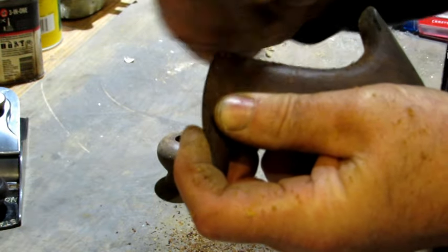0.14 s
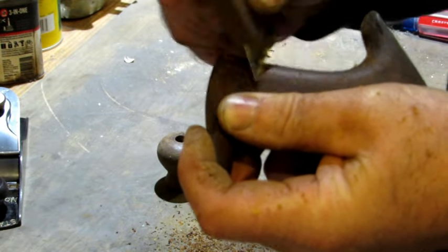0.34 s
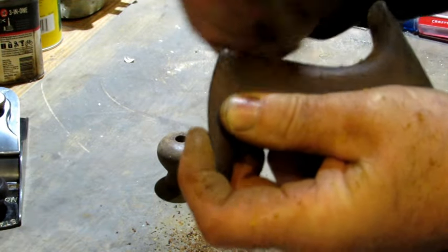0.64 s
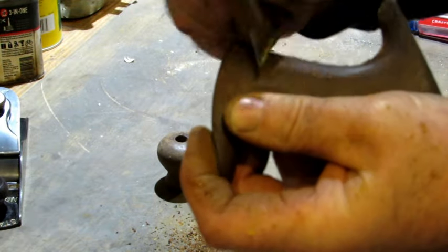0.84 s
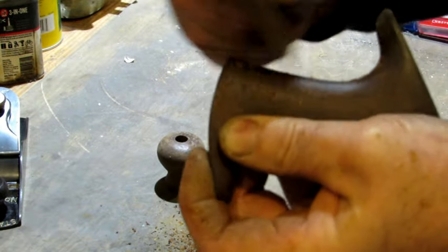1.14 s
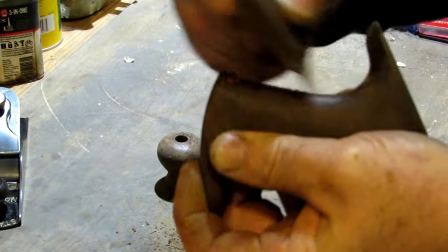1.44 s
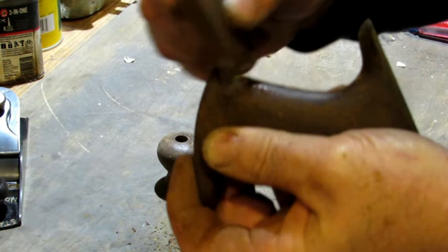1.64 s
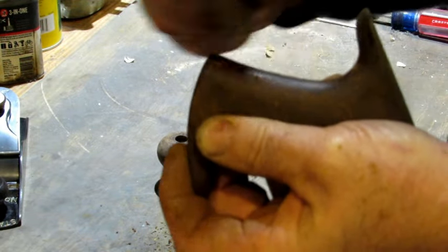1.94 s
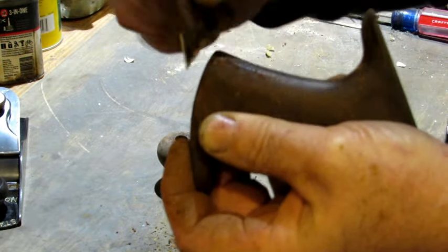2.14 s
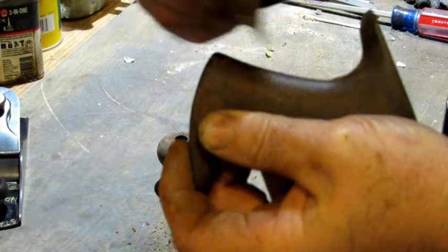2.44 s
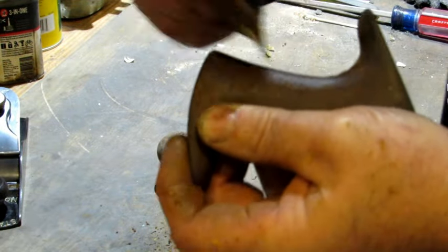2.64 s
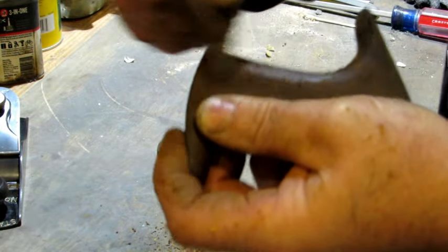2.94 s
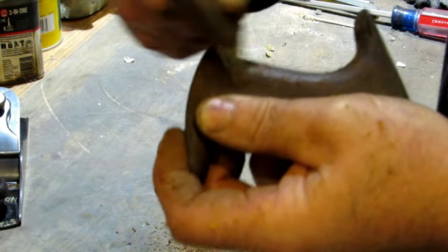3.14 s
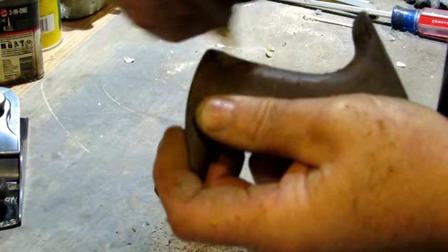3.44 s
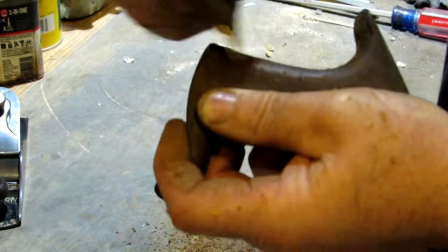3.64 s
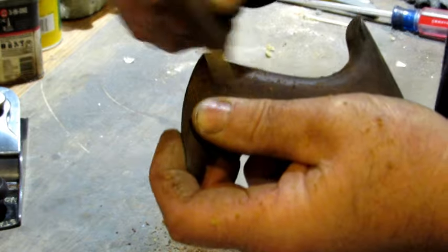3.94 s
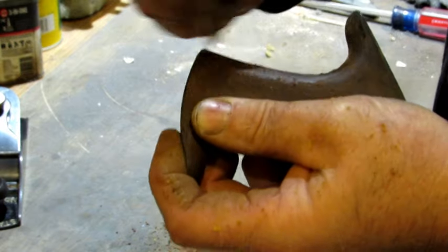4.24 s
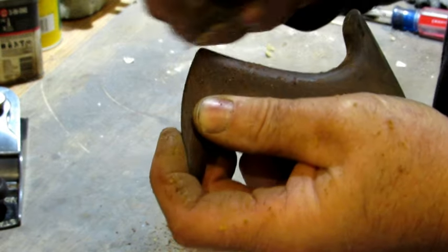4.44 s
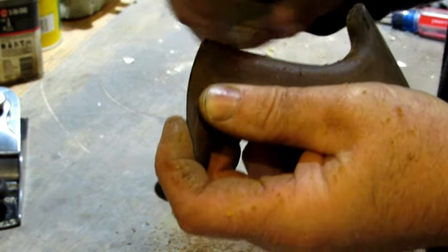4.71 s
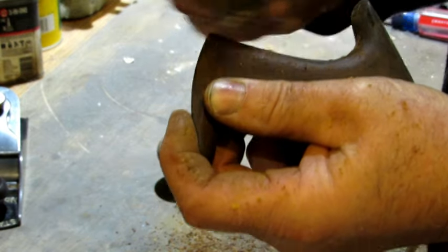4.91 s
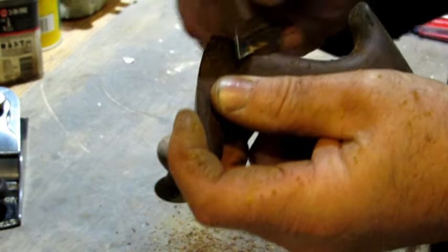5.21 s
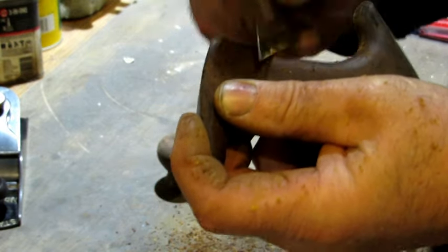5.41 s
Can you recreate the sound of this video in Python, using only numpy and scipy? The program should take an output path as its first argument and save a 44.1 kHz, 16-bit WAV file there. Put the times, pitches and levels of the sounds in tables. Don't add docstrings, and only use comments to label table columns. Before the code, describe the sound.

A small steel blade scrapes finish from a hand-held wooden handle, very close, in a quiet workshop with a short room tail. The sound begins with a scrape already landing at 0 seconds, then repeats at about 0.25, 0.5, 0.75 and 1 second. Every stroke is a dry woody knock around 2 kHz with a steely crack, followed at once by a gritty, bright hiss of some fifty milliseconds that fades with a falling, thin metallic colour. The first second is strongest, with rough judders near 0.07 and 0.35. From 1 to 2.5 seconds strokes are a little softer and evenly spaced. Near 2.7 to 3.2 they quicken and shorten, with a brief, harder rasp around 2.96. From 3.3 to 5.5 they run almost five per second, light and regular, slightly lower in colour towards the end. Faint wide air noise continues beneath, and the last scrape is cut near the end.

```python
import sys
import numpy as np
from scipy import signal
from scipy.fft import rfft, irfft, next_fast_len
from scipy.io import wavfile
from scipy.ndimage import uniform_filter1d, map_coordinates

SR = 44100
rng = np.random.default_rng(int(sys.argv[2]) if len(sys.argv) > 2 else 0)


def file_out(sig):
    cols = np.atleast_2d(sig).T
    lim = np.clip(cols, -1, 1)
    pcm = np.round(lim * 32767).astype(np.int16)
    wavfile.write(sys.argv[1], SR, pcm)


def gain_from_db(level_db):
    decades = np.asarray(level_db, float) / 20
    return 10 ** decades


N = 245548

# (frequency [Hz], width [Hz], level [dB])
WOOD_MODES = [(1650, 64, 0.5), (2000, 37, -1.5), (2085, 13.8, 4.5), (2391, 86.5, 4), (2460, 101, 6),
              (2854, 275, -4.5), (3336, 120, 0), (3650, 1140, -10), (5250, 2360, -20.5)]
# (frequency [Hz], width [Hz], level [dB])
HOLLOW_MODES = [(494, 300, -19), (589, 42, -6.5), (686, 45, -7.5), (813, 26.5, -1.5), (910, 36, -1.5),
                (1070, 100, -3), (1397, 35, -1.5)]


def cutting():
    settle_db, fade_s, leave_db = -14.5, 0.02, -48
    usual_db, body_follows, wood_grows, hollow_grows = -22, 0.58, 0.7, 0.23
    wood_db, hollow_db = -13.5, -15
    t = np.arange(N) / SR
    level = np.zeros((3, N))
    sings, streaks = [], []
    for s, bite, length, bite_db, lift_db in strokes():
        leave, sing_hz, cupped_db, mode_db = grip(s)
        lift = bite + length
        hiss = np.interp(t, [s - fade_s, s, bite, lift, lift + leave, lift + 2 * leave],
                         [-90, bite_db + settle_db, bite_db, lift_db, lift_db + leave_db, -90])
        top = max(bite_db, lift_db)
        body = np.where(hiss > -85, usual_db + body_follows * (hiss - top), -120)
        over = top - usual_db
        wood_level = body + wood_grows * over + wood_db
        hollow_level = body + hollow_grows * over + hollow_db + cupped_db
        level += gain_from_db([hiss - 1.5, wood_level, hollow_level])
        sings.append((sing_hz, 75400, 4.5))
        streaks.append((2510, 1800, mode_db))
    flakes = grit(14000, spread_db=2.5, clump_db=1.8)
    coarse = flakes + 2.2 * grit(1500, spread_db=3.5, clump_db=3)
    steel = patchy(filtered(flakes, edge), 2.8, bins=3, frames=7, glides=sings)
    wood = filtered(coarse, modes(WOOD_MODES, widen=2.16))
    wood = patchy(wood, 4, bins=2, frames=14, glides=streaks, width_hz=140)
    hollow = patchy(filtered(coarse, modes(HOLLOW_MODES, widen=3.16)), 2.1, bins=2, frames=12)
    return np.sum(level * [steel, wood, hollow], axis=0)


# (bite time [s], length [s], pressure at the bite [dB], pressure at the lift [dB])
STROKES = [(0.026, 0.058, -23.5, -19), (0.296, .053, -24.5, -20), (0.534, 0.06, -28, -19.5),
           (0.763, 0.07, -30.5, -18.5), (1.052, 0.038, -24, -23), (1.3, 0.054, -26, -27.5),
           (1.551, 0.058, -30.5, -23), (1.818, 0.065, -27, -24), (2.108, .042, -26.5, -27),
           (2.341, 0.048, -27.5, -29), (2.57, 0.029, -20.5, -29.5), (2.756, 0.027, -25, -20),
           (2.961, 0.0089, -20, -14), (3.183, 0.026, -21.5, -24.5), (3.376, 0.031, -24.5, -23),
           (3.565, 0.044, -24, -27), (3.763, 0.036, -32.5, -25.5), (3.959, 0.047, -26.5, -25),
           (4.168, 0.039, -25.5, -29.5), (4.386, 0.05, -24, -32), (4.603, 0.041, -23, -29),
           (4.806, 0.045, -26, -30), (5.028, 0.039, -25.5, -29.5), (5.247, 0.037, -30, -30.5),
           (5.463, 0.046, -25.5, -24)]


def strokes():
    settle_s = 0.029
    landed = [-settle_s] + [row[0] for row in LANDINGS]
    return [(min(s + settle_s, row[0] - 0.004), *row) for s, row in zip(landed, STROKES)]


# (time [s], time to leave the wood [s], edge sings at the start of a stroke [Hz], hand cupped
# [dB], grip mode stands out [dB])
GRIP = [
    (0, 0.13, 13900, 0, 1.5),
    (1.1, 0.09, 12800, -5, 5),
    (1.7, 0.096, 13800, -4, 5),
    (2.1, 0.07, 12600, -0.5, -1),
    (2.6, 0.11, 14200, -5, -3),
    (3.1, 0.088, 11500, -3.9, 1.5),
    (4, 0.029, 12900, -2.3, 5),
    (4.7, 0.07, 11400, -3.5, 20),
    (5.5, 0.061, 9400, -7, -3),
]


def grip(s):
    when, *cols = np.transpose(GRIP)
    return [np.interp(s, when, c) for c in cols]


def grit(rate, spread_db, clump_db):
    clumps = map_coordinates(rng.standard_normal(N // 40 + 4), [np.arange(N) / 40])
    sizes = gain_from_db(spread_db * np.minimum(rng.exponential(size=N), 4) + clump_db * clumps)
    return (rng.random(N) < rate / SR) * rng.choice([-1, 1], N) * sizes


# (frequency [Hz], level [dB per Hz])
STEEL_HISS = [(2120, -52), (3600, -30), (4080, -24), (4920, -10), (5750, -8.5), (7240, -4.5), (8410, -7.5),
              (10300, 0), (11300, -7), (12900, -2.5), (14800, -20.5), (15500, -77), (16000, -86)]


def edge(f):
    cepstrum = irfft(np.log(gain_from_db(along(STEEL_HISS, f))))
    half = len(cepstrum) // 2
    cepstrum[1:half] *= 2
    cepstrum[half + 1:] = 0
    return np.exp(rfft(cepstrum))[:len(f)]


def modes(peaks, widen):
    def response(f):
        total = 0
        for k, (centre, width, db) in enumerate(peaks):
            damping = 1j * f * width * widen
            total = total + (-1) ** k * gain_from_db(db) * damping / (centre * centre - f * f + damping)
        return total
    return response


def patchy(x, depth_db, bins, frames, glides=(), width_hz=1500):
    hz, t, z = signal.stft(x, SR, nperseg=256)
    field = uniform_filter1d(rng.standard_normal(z.shape), bins, 0)
    field = uniform_filter1d(field, frames, 1)
    gain_db = depth_db * unit(field)
    for (s, bite, length, *_), (first_hz, sag, db) in zip(strokes(), glides):
        centre = first_hz - sag * np.clip(t - s, 0, bite + length - s + 0.03)
        during = (t > s - 0.01) * (t < s + 0.18)
        gain_db += db * np.exp(-((hz[:, None] - centre) / width_hz) ** 2) * during
    y = signal.istft(z * gain_from_db(gain_db), SR, nperseg=256)[1][:N]
    return y / np.sqrt(np.abs(uniform_filter1d(y ** 2, size=2200)))


# (time [s], peak [dB], knock pitch [Hz], steel crack [dB re peak],
# upper bite [dB re peak])
LANDINGS = [(0.2483, -7, 2250, -18.5, -3), (0.507, -6.5, 2470, -12.5, 2), (0.726, -7, 2170, -10.5, -7.5),
            (0.9853, -10.5, 2010, -8, -10), (1.234, -9.5, 2270, -17.5, -3), (1.4977, -10, 2200, -12, -2.5),
            (1.7425, -9, 2085, -15, -11), (2.0463, -9.5, 1950, -8, -7.5), (2.2963, -12.5, 2000, -9, -4.5),
            (2.5147, -10, 2000, -5, 1), (2.7062, -10, 2000, -6.5, -3.5), (2.9137, -15.5, 2000, -6.5, -19),
            (3.1282, -14.5, 2000, -6, -13), (3.3307, -8, 2000, -8.5, -8), (3.5248, -11.5, 2000, -8, -7),
            (3.7205, -12.5, 2000, -8.5, -16), (3.9074, -11.5, 1820, -4.5, -11),
            (4.1214, -8.5, 1810, -4.5, -26), (4.326, -9, 2000, -8, -36), (4.5583, -9, 1980, -6, -30),
            (4.7631, -9, 2010, -9.5, -16), (4.984, -10.5, 2005, -8, -5.5), (5.2002, -12.5, 1870, -6, -20),
            (5.4346, -8.5, 1890, -4.5, 2)]
# (time [s], peak [dB], wood [dB re peak], steel [dB re peak])
CATCHES = [(0.067, -7, -22, 5), (0.353, -9.5, -15, 13), (0.62, -16.5, -3, 0), (0.857, -23, -21, -4),
           (1.316, -25, -9, 4), (1.813, -33, 6, 8), (2.115, -15.5, -21, -11), (2.758, -27, 16.5, 3),
           (2.948, -18.5, -6, 10), (3.376, -26, -5, 16), (3.946, -22.5, 9, -3), (4.374, -39, -8, 2),
           (5.021, -50, -9, 2), (2.009, -55, 8, 21)]


def knocks():
    thud_db, snap_db_re_crack, tick_db = -10, -5, -35
    knock, tick, blows = np.zeros(N + 3000), np.zeros(N + 3000), np.zeros((3, N + 3000))
    t = np.arange(2600) / SR
    blunt = signal.butter(N=2, Wn=11500, fs=SR, output="sos")
    split = signal.butter(N=2, Wn=7500, fs=SR, output="sos")
    for s, db, hz, crack_db, bite_db in LANDINGS:
        snap_db = crack_db + snap_db_re_crack
        i = round((s + 0.0001) * SR)
        span = slice(i, i + len(t))
        ring = np.sin(2 * np.pi * hz * t) + gain_from_db(bite_db - 2.5) * np.sin(2 * np.pi * 3250 * t)
        knock[span] -= gain_from_db(db + 1.5 - 60 * t / 0.0058) * ring * (1 - np.exp(-t / 0.0001))
        crack = gain_from_db(db + 14.5 - 60 * t / 0.003) * np.tanh(rng.standard_normal(len(t))) * 1.5
        snap = signal.sosfilt(split, crack)
        blows[0, span] += gain_from_db(crack_db + 2) * signal.sosfilt(blunt, crack - snap) + gain_from_db(snap_db + 2.5) * snap
        contact = rng.standard_normal(40) * gain_from_db(-60 * t[:40] / 0.00071)
        blows[1, i:i + 40] += gain_from_db(db + 6) * unit(contact)
        blows[2, i] -= gain_from_db(db + thud_db + 29.5)
        tick[span] += gain_from_db(crack_db + tick_db) * np.gradient(np.gradient(crack - snap))
        skid = gain_from_db(db - 60 * t / 0.048) * rng.standard_normal(len(t)) * (rng.random(len(t)) < 0.15)
        blows[:2, span] += gain_from_db([[snap_db + 4], [4]]) * skid
    for s, db, wood_db, crack_db in CATCHES:
        skips = (0.5 + 0.5 * np.cos(2 * np.pi * 230 * t)) ** 3
        judder = gain_from_db(db - 60 * t / 0.029) * skips * rng.standard_normal(len(t))
        blows[:, round(s * SR):][:, :len(t)] += gain_from_db([[crack_db - 8], [wood_db + 9], [17]]) * judder
    steel = filtered(blows[0, :N], edge)
    wood = filtered(blows[1, :N], modes(WOOD_MODES, widen=2.45))
    hollow = filtered(blows[2, :N], modes(HOLLOW_MODES, widen=0.93))
    return knock[:N] + steel + (wood + hollow), tick[:N]


# (frequency [Hz], t60 [s])
ROOM_T60 = [(400, 0.46), (1400, 0.45), (3600, 0.38), (9700, 0.27), (15000, 0.041)]


def space(x, block):
    out = np.zeros((2, N + SR))
    t = np.arange(300) / SR
    bench = rng.standard_normal((2, 300))
    for i in range(0, N, block):
        hz, when, z = signal.stft(rng.standard_normal((2, SR // 3)), SR, nperseg=256)
        decay = gain_from_db(-60 * when / along(ROOM_T60, hz)[:, None])
        tail = signal.istft(z * decay, SR, nperseg=256)[1]
        answer = np.pad(tail / np.linalg.norm(tail[0]), ((0, 0), (230, 0))) * gain_from_db([[-10], [-8]])
        scatter = bench * [[1], [0.4]] + 0.92 * rng.standard_normal((2, 300))
        scatter = scatter * gain_from_db(-60 * t / 0.0072)
        scatter[:, 1:] -= 0.42 * scatter[:, :-1]
        answer[:, 160:460] += scatter / np.linalg.norm(scatter[0]) * gain_from_db([[-3], [-1.5]])
        answer[:, :3] += [[0, 1, 0], [0.16, 0, -0.16]]
        answer[1, :40] += gain_from_db(-15.5) * rng.standard_normal(40) * gain_from_db(-60 * t[:40] / 0.0031)
        heard = signal.fftconvolve(x[None, i:i + block], answer, axes=1)
        out[:, i:i + heard.shape[1]] += heard
    return out[:, :N]


def dulled(x):
    return filtered(x, lambda f: 1 / (1 + (f / 15050) ** 60))


# (frequency [Hz], level [dB per Hz])
AIR_MID = [(20, -36), (40, -13), (100, -10), (300, -6), (800, -3), (1700, -12.5), (3300, -17), (5000, -18),
           (14000, -29.5), (15200, -64)]
AIR_SIDE = [(15, -20), (30, -11), (80, -5.5), (220, -2), (1000, -10.5), (3000, -23.5), (6000, -25),
            (14000, -27), (15200, -59)]


def air():
    noise = filtered(rng.standard_normal((2, N)), lambda f: gain_from_db([along(AIR_MID, f), along(AIR_SIDE, f)]))
    return np.array([gain_from_db(-53.5) * unit(noise[0]), gain_from_db(-46.5) * unit(noise[1])])


def unit(x):
    return x / np.sqrt(np.mean(x ** 2) + 1e-20)


def along(points, hz):
    f, v = np.transpose(points)
    return np.interp(np.log(hz + 1), np.log(f + 1), v)


def filtered(x, response):
    m = next_fast_len(N + SR // 2)
    return irfft(rfft(x, m) * response(np.fft.rfftfreq(m, 1 / SR)), m)[..., :N]


# (frequency [Hz], side [dB re mid])
SIDE_GAIN = [(300, -2), (700, -7.5), (1300, -8.5), (2400, -8), (4000, -7.5), (6000, -6.5), (8000, -4),
             (10300, 1), (14000, -2.5)]


def scene():
    low_cut = signal.butter(N=4, Wn=380, btype="high", fs=SR, output="sos")
    knock, tick = knocks()
    radiated = signal.sosfilt(low_cut, cutting() + knock)
    mid, side = dulled(space(radiated, block=5000)) + tick * gain_from_db([[0], [-3]])
    side = filtered(side, lambda f: gain_from_db(along(SIDE_GAIN, f)))
    mid, side = np.array([mid, side]) + air()
    return np.array([mid + side, mid - side]) * gain_from_db([[-0.2], [0.2]])


def band_limit(x):
    return signal.sosfilt(signal.butter(12, 16860, fs=SR, output="sos"), x)


def record(dry):
    def dip(f, hz, width, depth):
        return 1 - depth * 1j * f * width / (hz * hz - f * f + 1j * f * width)
    heard = filtered(dry, lambda f: dip(f, 3960, 280, 0.94) * dip(f, 7930, 200, 0.7))
    heard = heard / (1 + np.abs(heard / 0.95) ** 6) ** (1 / 6)
    return band_limit(heard)


dry = scene()
out = record(dry)
file_out(out)
```